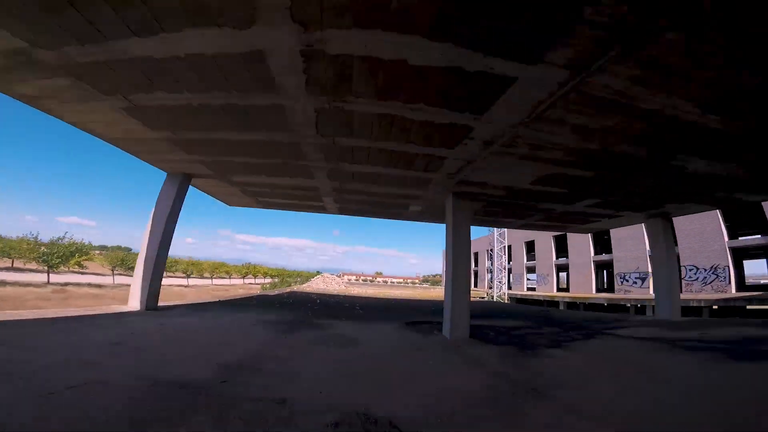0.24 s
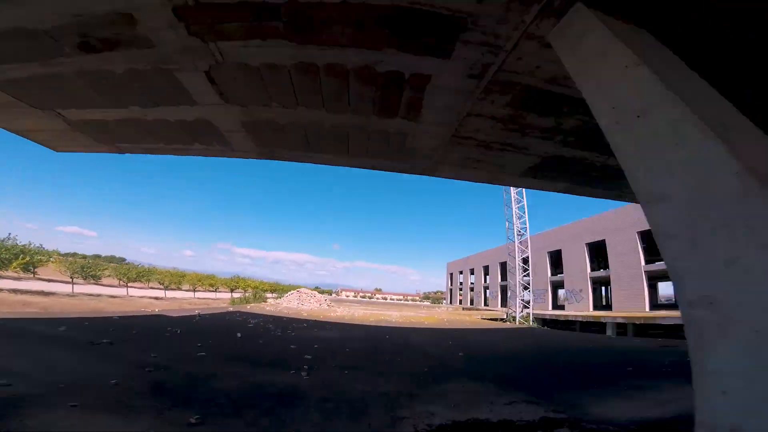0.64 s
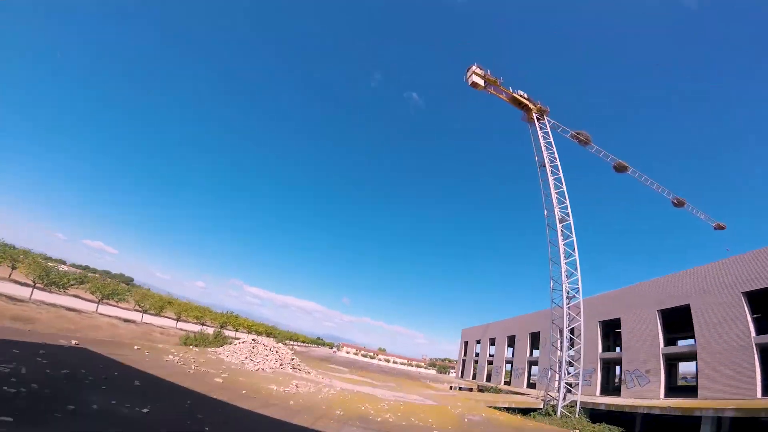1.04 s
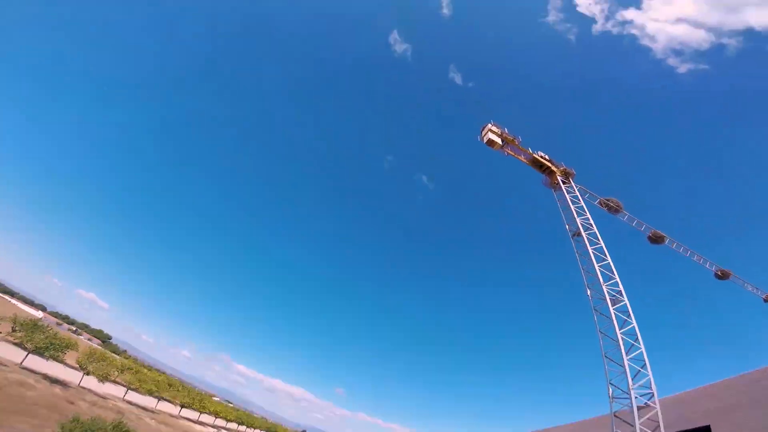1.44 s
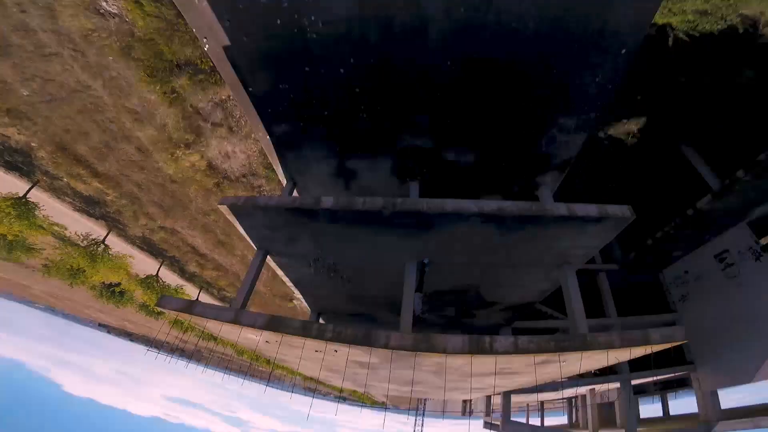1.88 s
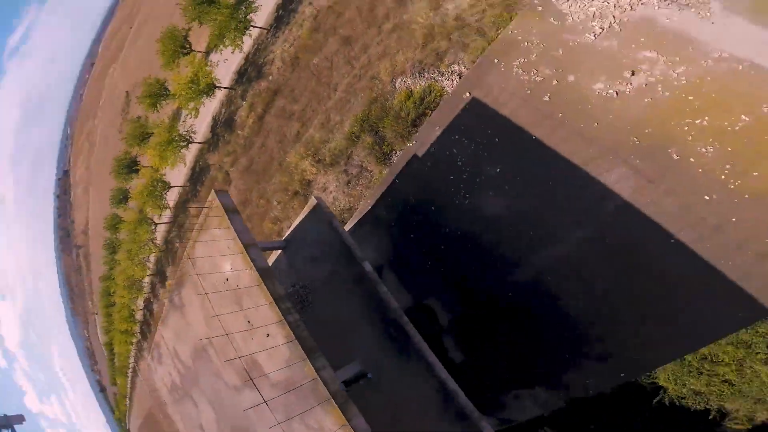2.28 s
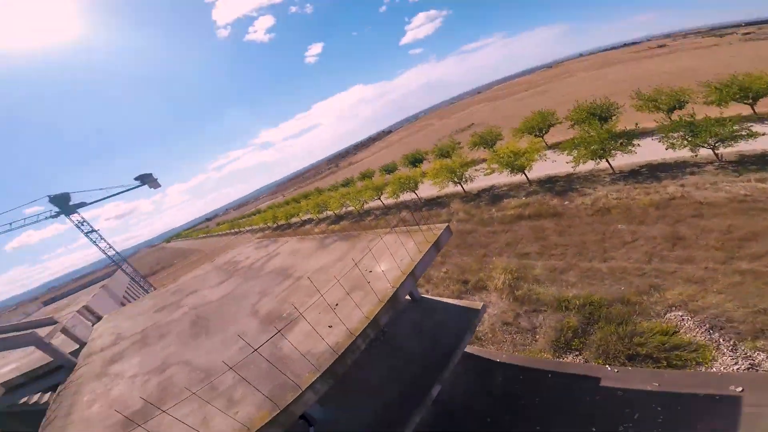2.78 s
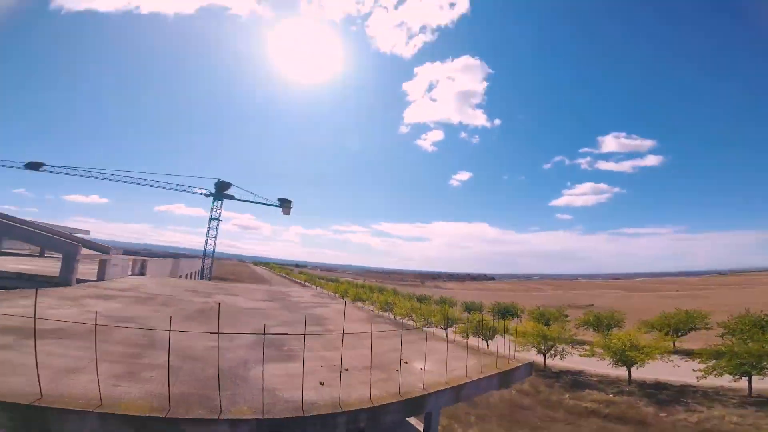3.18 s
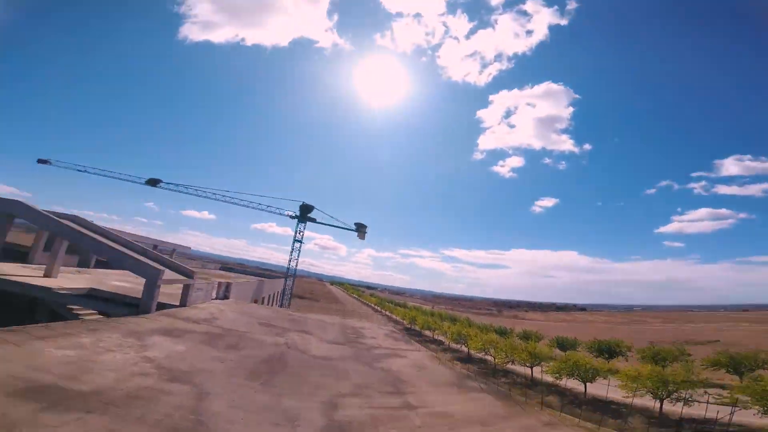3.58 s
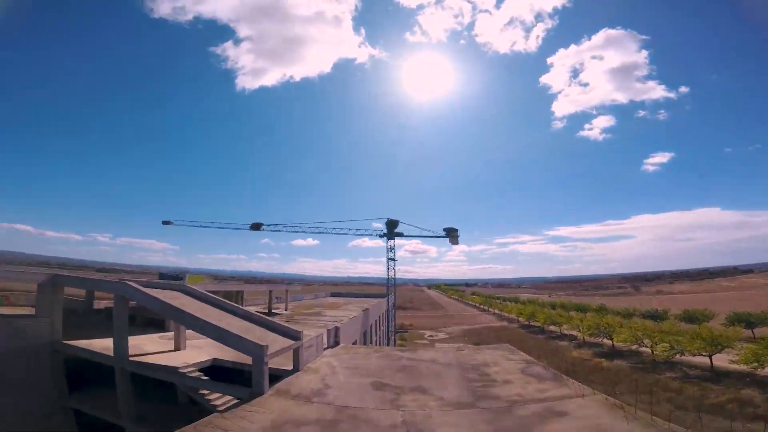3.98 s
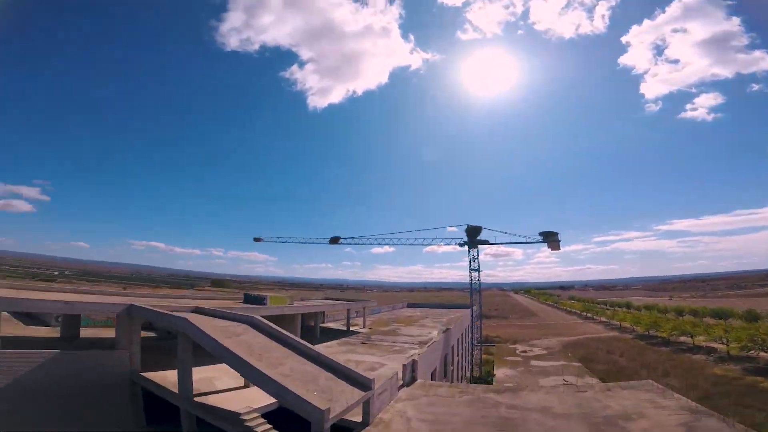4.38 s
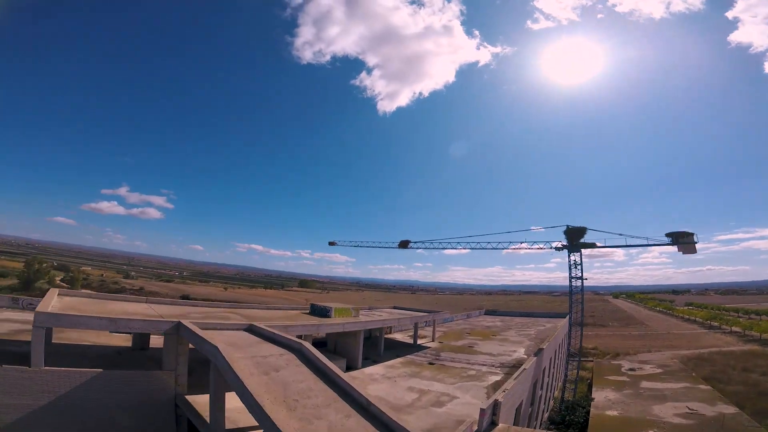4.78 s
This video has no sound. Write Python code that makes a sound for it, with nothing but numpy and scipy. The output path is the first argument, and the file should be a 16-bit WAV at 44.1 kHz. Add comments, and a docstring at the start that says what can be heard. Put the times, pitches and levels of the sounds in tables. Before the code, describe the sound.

The propellers of a small racing drone whine at several close pitches, heard from a microphone on board in the open air. The whine climbs to a high scream, then drops suddenly to a quiet, low, fluttering idle. It surges up again with a snarl and falls back to a raspy cruising buzz. Air hisses from the blades, and wind rumbles on the microphone throughout.

```python
"""Four three-blade propellers whine at slightly different speeds on a racing quadcopter, heard on board.
It cruises, climbs, idles through a flip, punches out and cruises on. Blade loading radiates a harmonic
series on each blade rate, shed turbulence hisses, and rotor imbalance shakes the frame.
Behind them the motors sing faintly at idle, and wind rumbles on the camera's microphone."""
import sys
import numpy as np
from scipy.fft import rfft, irfft, next_fast_len
from scipy.io import wavfile
from scipy.ndimage import uniform_filter1d, minimum_filter1d, map_coordinates

SR = 44100
rng = np.random.default_rng(int(sys.argv[2]) if len(sys.argv) > 2 else 0)


def dump(signal):
    """Clip the signal to [-1, 1] and save it as 16-bit WAV at the path in sys.argv[1]."""
    limited = np.clip(np.atleast_2d(signal).T, -1, 1)
    pcm = np.round(limited * 32767).astype(np.int16)
    wavfile.write(sys.argv[1], SR, pcm)


N = 221823
BLADES = 3

# Overtones of steady, chopped and buzzing blades: (multiple of the blade rate, relative level [dB])
STEADY_OVERTONES = [(2, -15.5), (3, -27), (4, -30.5), (5, -33), (6, -35), (10, -34)]
CHOPPED_OVERTONES = [(2, -7.5), (3, -4.5), (4, -9), (10, -21.5)]
BUZZ_OVERTONES = [(2, 4), (3, 0), (4, 3.5), (5, 0.5), (7, -6.5), (10, -26)]
# Path from the blades to the microphone: (frequency [Hz], gain [dB])
HOUSING_RESPONSE = [(800, 0.5), (1100, 2.5), (1700, 0.5), (2300, -2), (3100, -4), (4000, -6.5), (5200, 0.5),
                    (7500, -4), (9500, -26), (12000, -26)]
def propellers(phases, levels):
    """Loading noise: steady thrust gives each rotor a tone; cutting turbulence adds overtones and growl."""
    near, twin, buzzy, far = phases
    softening = amp(levels["softening"])
    whine = amp(levels["near"]) * (tone(near, 0.085) + softening * overtones(near, STEADY_OVERTONES, 0.12))
    whine += amp(levels["twin"]) * (tone(twin, 0.2) + softening * overtones(twin, STEADY_OVERTONES, 0.089))
    whine += amp(levels["buzzy"]) * tone(buzzy, 0.08)
    whine += amp(levels["buzz"]) * overtones(buzzy, BUZZ_OVERTONES, rough=0.1)
    whine += amp(levels["far"]) * tone(far, 0.13)
    chopped = amp(-7) * overtones(twin, CHOPPED_OVERTONES, rough=0.26)
    chopped += amp(-3) * overtones(far, CHOPPED_OVERTONES, rough=0.32)
    growl = amp(-8.5) * unit(sum(shaft_harmonics(phase) for phase in phases))
    return coloured(whine + amp(levels["rasp"]) * (chopped + growl), HOUSING_RESPONSE)


def shaft_harmonics(phase, count=8):
    """Asymmetry: unequal blades repeat only once a turn, adding lines between the blade harmonics."""
    return sum(tone(k * phase / BLADES, 0.35) / np.sqrt(k) for k in range(2, count + 1) if k % BLADES)


def blade_phase(rate, hunt, sway_hz=3.464):
    """Frequency modulation: the flight controller's trimming makes the speed wander about its setting."""
    speed = rate * (1 + hunt * wobble(42) + 0.00306 * wobble(170)) + sway_hz * wobble(20)
    passes = np.cumsum(speed) / SR + rng.random()
    return (2 * np.pi * (passes % BLADES)).astype(np.float32)  # wraps once a shaft turn


# Throttle of the near, loudest rotor: (time [s], blade rate [Hz])
NEAR_BLADE_RATE = [(0, 527.8), (.33, 519), (.38, 536.5), (.43, 514), (.55, 505.4), (.64, 543.4),
                   (.735, 514.5), (.8, 545), (.9, 630.3), (1.0, 668.4), (1.18, 717), (1.38, 794),
                   (1.46, 909), (1.53, 915), (1.63, 1018), (1.705, 1180), (1.755, 1034), (1.81, 416.5),
                   (1.85, 261.2), (1.93, 320.6), (2.04, 240.4), (2.17, 324.8), (2.29, 347.4), (2.45, 280.2),
                   (2.8, 227.8), (2.9, 262.1), (2.97, 320), (3.15, 697.4), (3.25, 760.6), (3.35, 906.1),
                   (3.45, 1018), (3.51, 1009), (3.55, 836.6), (3.61, 470.3), (3.9, 447.4), (4.42, 492),
                   (4.65, 461), (4.85, 469.5), (5.03, 572)]
# Steering, as speeds over the near rotor's: (time [s], twin [ratio], buzzy [ratio], far [ratio])
SPEED_RATIOS = [(0, 1.116, 1.12, 1.28), (1.1, 1.085, 1.065, 1.267), (1.7, 1.02, 1.06, 1.075),
                (1.93, 1.19, 1.03, 1.35), (2.05, .89, .9, .93), (2.29, .8, 1, 0.94), (2.39, .8, .96, .97),
                (2.55, 0.97, .93, 0.99), (2.59, 0.88, 0.79, 1.17), (2.65, 0.68, .95, 1.03),
                (2.69, .8, .81, 0.98), (2.76, .74, 1.0, 1.02), (2.87, .73, 1.08, 1.13),
                (3.1, 1.01, 1.04, 1.27), (3.27, 1.09, 1.14, 1.27), (3.45, .97, 1.02, 1.08),
                (3.55, 0.98, 1.18, 1.11), (3.63, 0.92, 1.17, 1.2), (3.8, 1.06, 1.14, 1.044),
                (4.05, 1.12, 1.11, 1.17), (4.45, 1.066, 1.153, 1.19), (4.77, 1.19, 1.32, 1.31),
                (4.86, 1.31, 1.54, 1.5), (4.96, 1.19, 1.28, 1.3), (5.03, 1.01, 1.22, 1.03)]
def blade_rates():
    """Differential thrust: the craft steers by running its four rotors at different speeds."""
    throttle = curves(NEAR_BLADE_RATE)[0]
    return [uniform_filter1d(throttle * ratio, size=900) for ratio in [1] + curves(SPEED_RATIOS)]


# Roughness of the air the blades take in: (time [s], level [dB])
INFLOW_TURBULENCE = [(0, -1), (.7, 2.5), (1.08, 2), (1.33, 0), (1.62, 3.5), (1.76, 1.5), (1.845, -1.5),
                     (1.95, -2), (2.05, -9.5), (2.2, -3.5), (2.5, -2.5), (2.85, -1), (3.13, 5),
                     (3.46, -1.5), (3.62, -5.5), (3.8, -3.5), (4.25, 2), (4.85, 6), (5.03, 6)]
# Falls through the craft's own downwash: (peak time [s], rise [s], fall [s], strength [ratio])
DOWNWASH_PASSES = [(1.907, 0.021, 0.066, 1.17), (2.19, 0.091, 0.032, .45), (2.745, 0.018, 0.063, 0.63),
                   (3.018, .14, 0.26, 1.09)]
# Change from climbing and tumbling to level flight: (time [s], share [0-1])
FORWARD_FLIGHT = [(3.0, 0), (3.52, 0.13), (3.85, 0.94)]
# Level law of each sound: (level at full speed [dB], slope with rotor loudness [dB/dB],
# slope with turbulence [dB/dB], gain in downwash [dB], gain in forward flight [dB])
LEVEL_LAWS = {"near": (-22.5, 1.27, 0.57, -2.5, -3), "twin": (-39.5, 0.97, 0.1, 11, 8.5),
              "buzzy": (-37.5, 1.13, 0.68, 8, 1), "far": (-38, 2.05, 0.84, 3, -0.5),
              "buzz": (-60.5, 1, 2.15, 11.5, 13), "wash": (-41.5, 0.1, 0.78, 9.5, 1.5),
              "rasp": (-45, 0.47, 1.37, 12, 6), "hiss": (-42.5, 1, 1.5, 5.5, -2.5),
              "fizz": (-51.5, 1.55, 1, 7.5, 7.5), "shake": (-34.5, 1.15, 0.8, 7, 10),
              "bearings": (-58.5, 0.4, 0.2, -3, -6), "scream": (-40, -0.5, 0.96, 5, -25)}
def source_levels(near_rate, knee_hz=511, steepness=6.27, spool_db=0.36, spool_s=0.058, soften_db=-4.5):
    """Power law: loudness rises steeply with rotor speed and rough air,
    then levels off as the camera holds it down."""
    throttle = curves(NEAR_BLADE_RATE)[0]
    # The blades bite harder as the rotor speeds up and slacken as it brakes.
    spool = uniform_filter1d(np.gradient(np.log(throttle)) * SR, int(spool_s * SR))  # e-folds a second
    loudness_db = spool_db * spool - 10 * np.log10(1 + (knee_hz / near_rate) ** steepness)
    t = np.arange(N) / SR
    downwash = sum(strength * np.exp(-((t - peak) / np.where(t < peak, rise, fall)) ** 2)
                   for peak, rise, fall, strength in DOWNWASH_PASSES)
    turbulence_db, forward = curves(INFLOW_TURBULENCE)[0], curves(FORWARD_FLIGHT)[0]
    levels = {name: db + by_loudness * loudness_db + by_turbulence * turbulence_db
              + downwash_db * downwash + forward_db * forward
              for name, (db, by_loudness, by_turbulence, downwash_db, forward_db) in LEVEL_LAWS.items()}
    levels["softening"] = soften_db * forward  # on the steady overtones of the near and twin rotors
    return levels


# Overtones of a blade tip near full speed: (multiple of the blade rate, relative level [dB])
TIP_OVERTONES = [(2, -30), (3, -2), (4, -3), (5, -4), (6, -6), (7, -6), (10, -23)]
def tip_scream(phases, rates, levels, full_hz=1100, steepness=2.24):
    """Pulse steepening: faster tips sharpen their pressure pulses, so the upper harmonics grow."""
    near, twin = ((rate / full_hz) ** steepness * overtones(phase, TIP_OVERTONES, rough=0.21)
                  for rate, phase in zip(rates[:2], phases))
    return amp(levels["scream"]) * coloured(near + amp(-17.5) * twin, HOUSING_RESPONSE)


# Blades biting disturbed air as the craft pulls out of its dive: (time [s], level [dB])
BITE_ENVELOPE = [(2.92, -75), (3.02, -45), (3.12, -34), (3.27, -35), (3.35, -46), (3.5, -60)]
# Overtones of the swinging load: (multiple of the blade rate, relative level [dB])
BITE_OVERTONES = [(2, 1.5), (3, -14), (4, -20)]
def blade_bite(phases):
    """Unsteady loading: uneven inflow swings the blade load, and all four rotors snarl an octave up."""
    snarl = sum(overtones(phase, BITE_OVERTONES, rough=0.15, count=4) for phase in phases)
    return amp(curves(BITE_ENVELOPE)[0]) * snarl


# Bands of shed turbulence, low to high: (frequency [Hz], relative spectral density [dB])
WASH_SPECTRUM = [(130, -13.5), (250, 8), (800, 1.5), (1300, -7.5), (4000, -65)]
RASP_SPECTRUM = [(600, -53), (1300, 2.5), (2000, 4.5), (4000, -2), (4800, -6.5), (6500, -45)]
HISS_SPECTRUM = [(3500, -20), (4700, -11.5), (5500, -6), (6800, -2), (8700, -11.5), (10500, -58)]
FIZZ_SPECTRUM = [(6500, -28), (8400, -6.5), (9500, -5), (10500, -12), (11800, -23.5), (13500, -26),
                 (15000, -30.5)]
def churned_air(phases, levels, chop=0.22):
    """Amplitude modulation: the noise of shed turbulence pulses as blades pass an arm."""
    near, _, buzzy, _ = phases
    pulse = unit(np.exp(chop * (np.cos(near) + 0.66 * np.cos(buzzy)) + 0.093 * np.cos(near / BLADES)))
    eddies = amp(0.45 * wobble(70))
    wash = amp(levels["wash"]) * noise(WASH_SPECTRUM)
    rasp = amp(levels["rasp"] - 2.5) * noise(RASP_SPECTRUM)
    hiss = amp(levels["hiss"]) * noise(HISS_SPECTRUM)
    fizz = amp(levels["fizz"]) * noise(FIZZ_SPECTRUM)
    return eddies * (wash + pulse * (rasp + hiss + fizz))


# How the frame gives way to shaking: (frequency [Hz], gain [dB])
FRAME_RESPONSE = [(100, 4.5), (150, 3.5), (220, 0.5), (330, -1.5)]
# Resonance of the arms: (frequency [Hz], bandwidth [Hz], relative level [dB])
ARM_MODES = [(5440, 1140, 0)]
def frame(phases, levels, ring_db=-18):
    """Forced vibration: each unbalanced rotor shakes the frame once a turn, and the arms ring."""
    near, twin, buzzy, far = (tone(phase / BLADES, 0.43) for phase in phases)
    hum = unit(amp(-1.5) * near + twin + amp(-2) * buzzy + far)
    return amp(levels["shake"]) * (coloured(hum, FRAME_RESPONSE) + amp(ring_db) * ringing(ARM_MODES))


# Thin singing of the motors at idle: (time [s], level [dB])
COGGING_ENVELOPE = [(2.25, -74), (2.37, -55.5), (2.5, -69), (2.58, -58), (2.67, -61), (2.72, -62),
                    (2.87, -64), (3.1, -87)]
# Path from the stators to the microphone: (frequency [Hz], gain [dB])
STATOR_RESPONSE = [(4000, -13), (6500, 2.5), (8000, -11), (10000, -38)]
# Resonances of the motor bells: (frequency [Hz], bandwidth [Hz], relative level [dB])
BELL_MODES = [(2670, 84, -3), (4710, 310, -5), (6050, 160, -7.5), (7220, 370, -5.5)]
def motors(phases, levels, cogs_per_turn=84, flicker_db=3, waver_db=2.2):
    """Cogging and resonance: magnets passing stator teeth sing, and the bearings ring the motor bells."""
    near, twin, buzzy, far = (tone(phase * cogs_per_turn / BLADES, 0.5) for phase in phases)
    cogging = coloured(buzzy + amp(-6) * (near + twin + far), STATOR_RESPONSE)
    bearings_db = levels["bearings"] + waver_db * wobble(14)
    cogging_db = curves(COGGING_ENVELOPE)[0] + flicker_db * wobble(30)
    return amp(cogging_db) * cogging + amp(bearings_db) * ringing(BELL_MODES)


# Airflow on the microphone: (time [s], buffet level [dB], flutter level [dB])
WIND_ENVELOPES = [(0, -33.5, -31.5), (.7, -26, -30), (1.1, -28, -25), (1.8, -28.5, -29.5),
                  (1.93, -27.5, -26), (2.1, -35.5, -38), (2.45, -37.5, -34.5), (2.75, -33.5, -26.5),
                  (3.15, -21.5, -21.5), (3.45, -25, -25.5), (3.7, -36.5, -30), (4.2, -29, -44),
                  (4.7, -29, -25), (5.03, -29.5, -30)]
# The low buffet and the flutter above it: (frequency [Hz], relative spectral density [dB])
BUFFET_SPECTRUM = [(12, -39), (25, 1.5), (45, 2.5), (80, 2.5), (110, -2), (200, -41), (400, -120)]
FLUTTER_SPECTRUM = [(60, -31), (95, -0.5), (122, 4), (150, -5), (270, -22), (1000, -89)]
def wind(buffet_db=1.57, flutter_db=-0.37, gust_db=0.93):
    """Turbulent pressure: airflow buffets the microphone port in two bands that gust separately."""
    low_db, high_db = curves(WIND_ENVELOPES)
    buffet = amp(low_db + buffet_db + gust_db * wobble(9)) * noise(BUFFET_SPECTRUM)
    flutter = amp(high_db + flutter_db + gust_db * wobble(7.4)) * noise(FLUTTER_SPECTRUM)
    return buffet + flutter


def tone(phase, rough):
    """Random modulation: turbulence shakes the amplitude and phase of a sine of rms about 1."""
    rough = float(rough)
    return (2 / (1 + rough ** 2)) ** .5 * (1 + rough * wobble(140)) * np.sin(phase + rough * wobble(140))


def overtones(phase, orders, rough, count=10):
    """Harmonic series on the blade rate, from the second harmonic up, rougher with each order."""
    return sum(float(amp(along(orders, k))) * tone(k * phase + 2 * np.pi * rng.random(), rough * np.sqrt(k))
               for k in range(2, count + 1))


def ringing(modes):
    """Resonance: noise through a sum of squared band-pass responses, at rms 1."""
    def response(hz):
        return sum(amp(db) * (1j * hz * width / (centre ** 2 - hz * hz + 1j * hz * width)) ** 2
                   for centre, width, db in modes)
    return unit(filtered(rng.standard_normal(N), response))


def noise(spectrum):
    """Spectral shaping: coloured noise of rms 1."""
    return unit(coloured(rng.standard_normal(N), spectrum))


def coloured(x, spectrum):
    """Linear filtering by a table of (frequency [Hz], gain [dB])."""
    return filtered(x, lambda hz: amp(along(spectrum, hz)))


def filtered(x, response):
    """Convolution theorem: the spectrum of x times a function of frequency."""
    size = next_fast_len(N + SR // 4, real=True)
    gain = response(np.fft.rfftfreq(size, 1 / SR)).astype(np.complex64)
    return irfft(rfft(x.astype(np.float32), size) * gain, size)[:N]


def wobble(rate, block=64):
    """Spline interpolation: a smooth curve through `rate` random knots a second."""
    at = np.arange(0, N + 2 * block, block) * rate / SR
    coarse = map_coordinates(rng.standard_normal(int(at[-1]) + 4), [at]).astype(np.float32)
    ramp = np.arange(block, dtype=np.float32) / block
    return (coarse[:-1, None] + np.diff(coarse)[:, None] * ramp).ravel()[:N]


def curves(rows):
    """Linear interpolation: one value per sample for each column after the time."""
    times, *columns = np.transpose(rows)
    return [np.interp(np.arange(N) / SR, times, column) for column in columns]


def along(points, at):
    """Interpolation on a logarithmic axis."""
    positions, values = np.transpose(points)
    return np.interp(np.log(at + 1e-9), np.log(positions), values)


def amp(db):
    """Decibels to amplitude ratio."""
    return np.exp(np.asarray(db) * (np.log(10) / 20))


def unit(x):
    """Normalisation to rms 1."""
    return x / np.sqrt(np.mean(x ** 2) + 1e-20)


def scene():
    """Superposition: all sources ride on one frame and add at one nearby microphone."""
    rates = blade_rates()
    levels = source_levels(rates[0])
    hunts = (0.01227, 0.011, 0.00496, 0.00413)  # relative speed wander: near, twin, buzzy, far
    phases = [blade_phase(rate, hunt) for rate, hunt in zip(rates, hunts)]
    rotors = propellers(phases, levels) + tip_scream(phases, rates, levels) + blade_bite(phases)
    rotors += churned_air(phases, levels)
    return (rotors + motors(phases, levels) + frame(phases, levels) + wind())[None]


def record(dry, ceiling=0.26, top_hz=15150):
    """Peak and band limiting: the camera holds the peaks down and cuts the highest treble."""
    needed = np.minimum(1, ceiling / (np.abs(dry[0]) + 1e-9))
    gain = uniform_filter1d(minimum_filter1d(needed, size=500), size=400)
    return filtered(gain * dry[0], lambda hz: hz < top_hz)[None]


dry = scene()
out = record(dry)
dump(out)
```